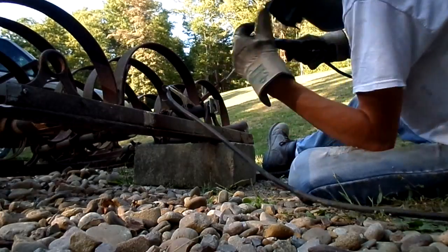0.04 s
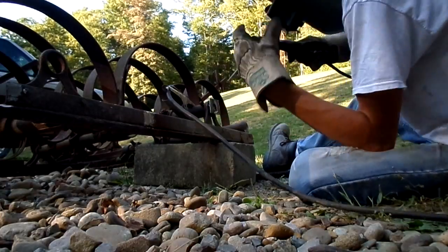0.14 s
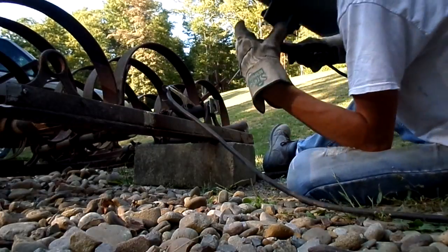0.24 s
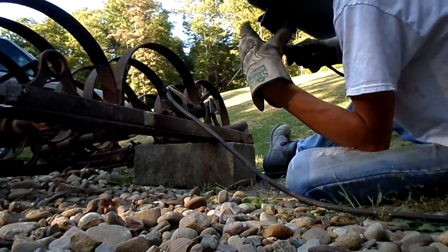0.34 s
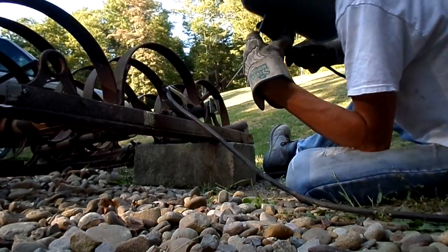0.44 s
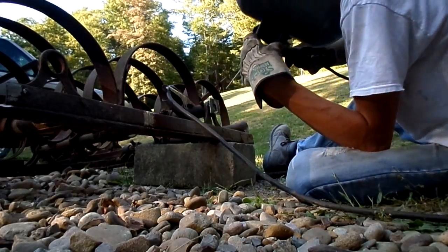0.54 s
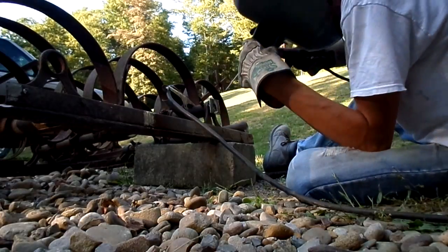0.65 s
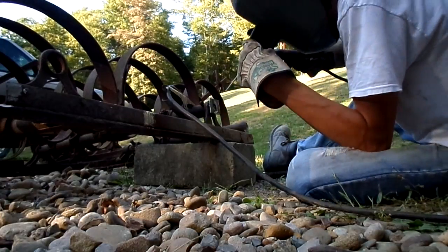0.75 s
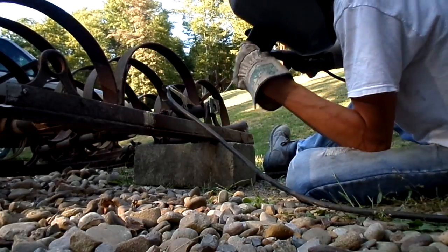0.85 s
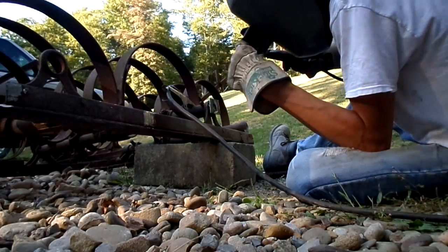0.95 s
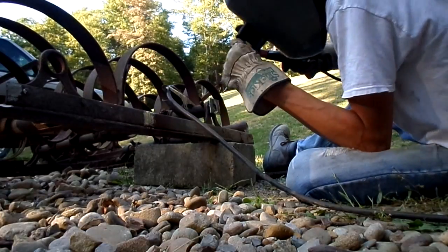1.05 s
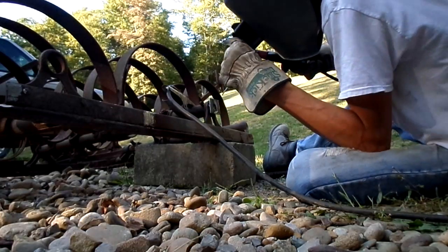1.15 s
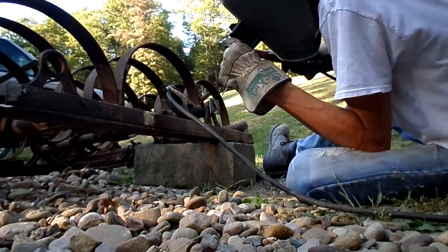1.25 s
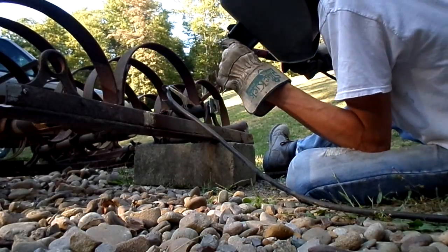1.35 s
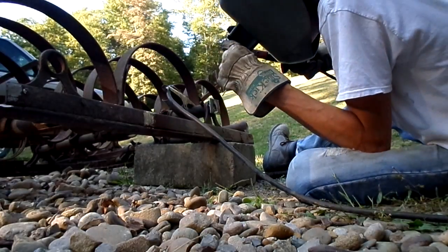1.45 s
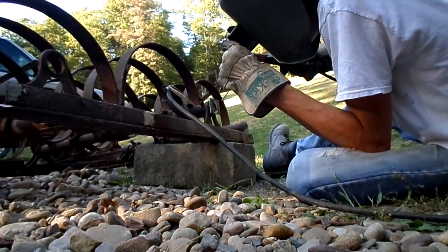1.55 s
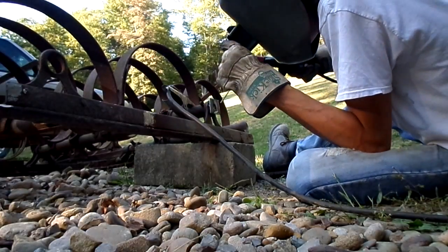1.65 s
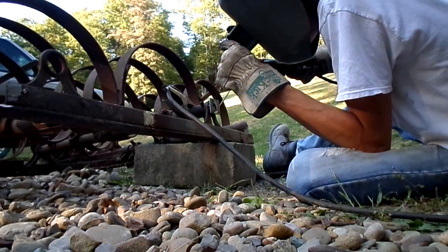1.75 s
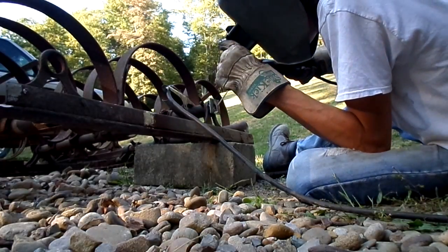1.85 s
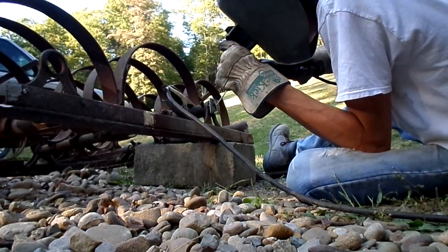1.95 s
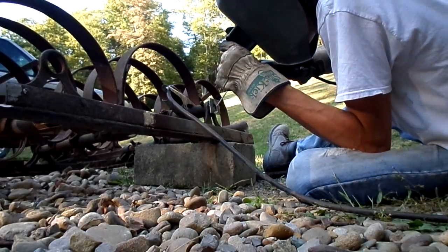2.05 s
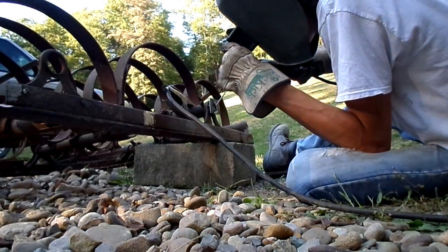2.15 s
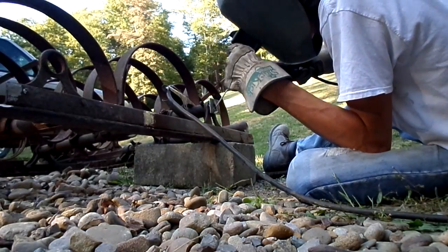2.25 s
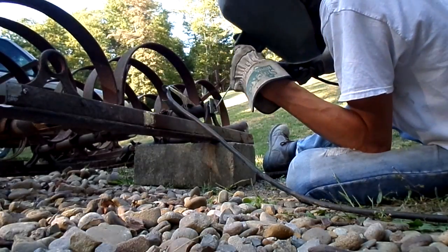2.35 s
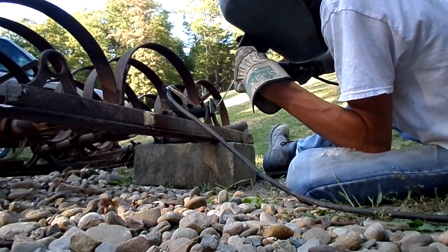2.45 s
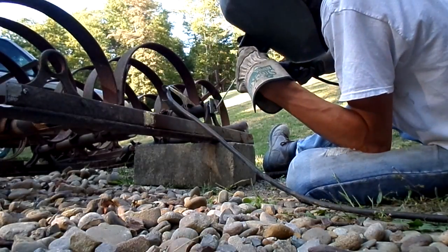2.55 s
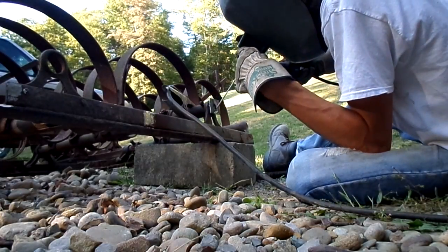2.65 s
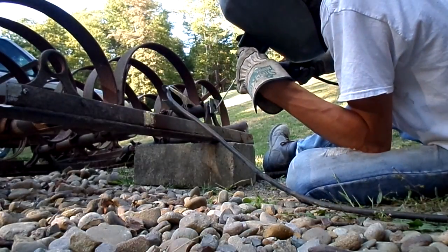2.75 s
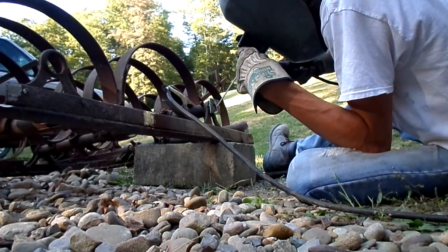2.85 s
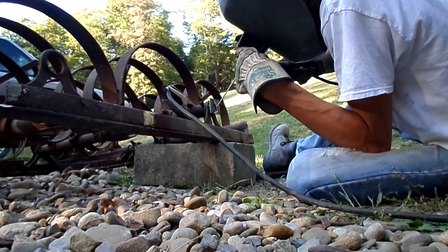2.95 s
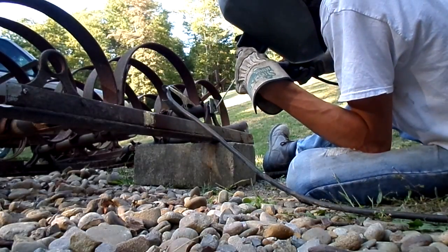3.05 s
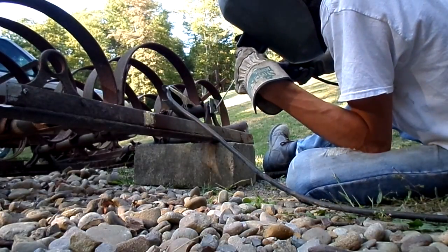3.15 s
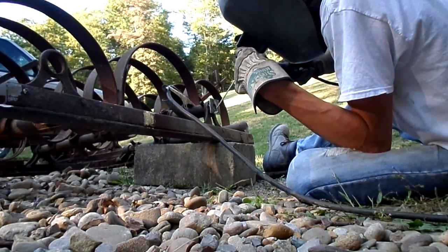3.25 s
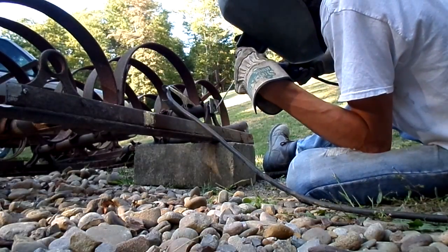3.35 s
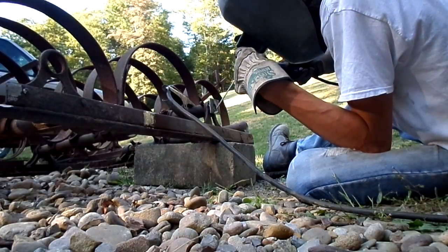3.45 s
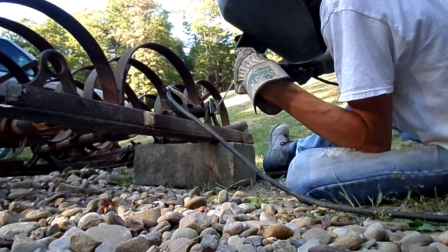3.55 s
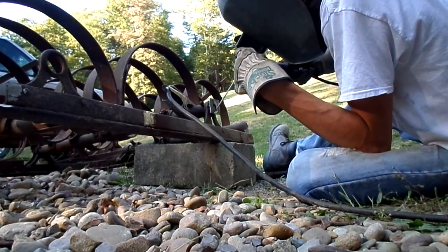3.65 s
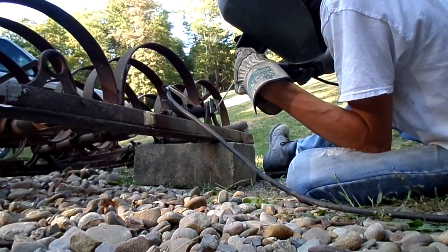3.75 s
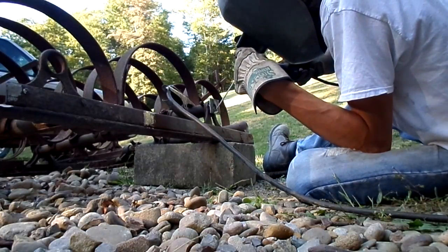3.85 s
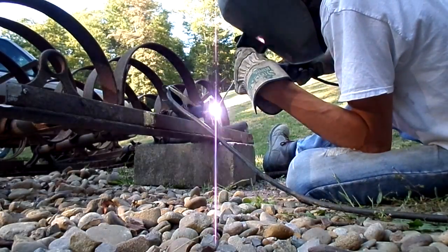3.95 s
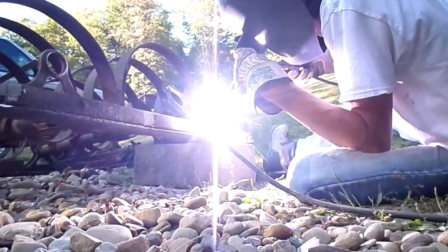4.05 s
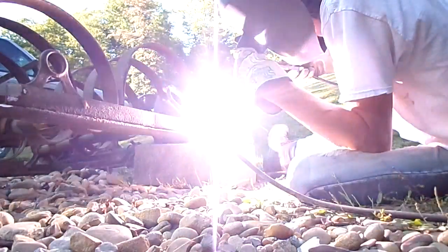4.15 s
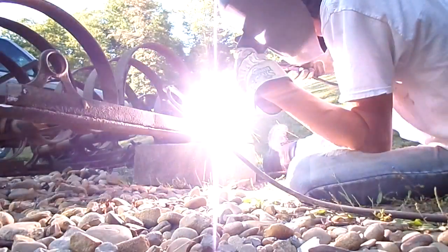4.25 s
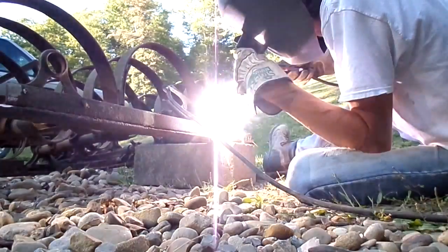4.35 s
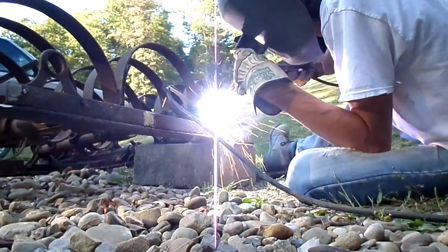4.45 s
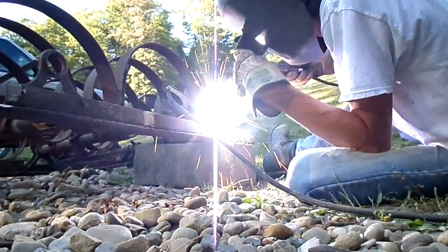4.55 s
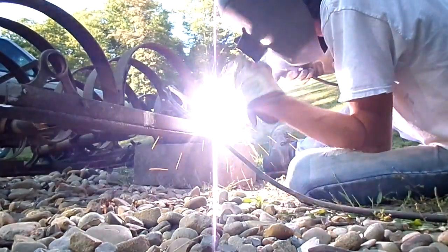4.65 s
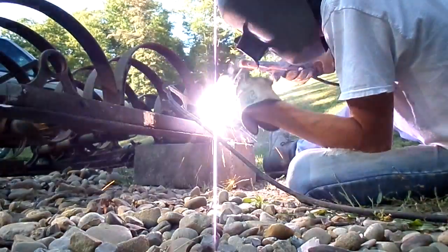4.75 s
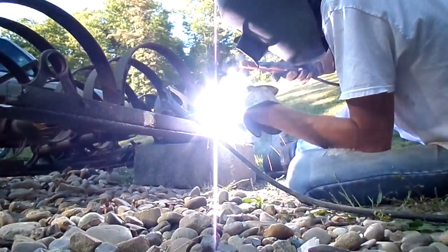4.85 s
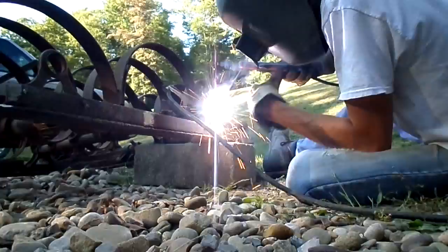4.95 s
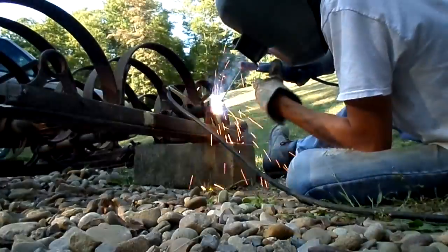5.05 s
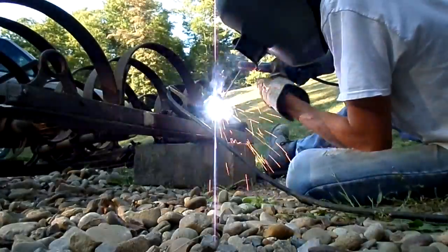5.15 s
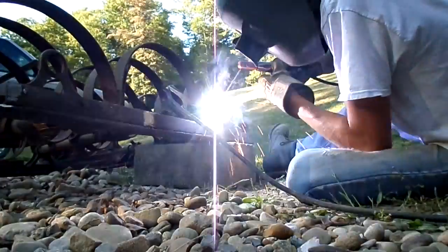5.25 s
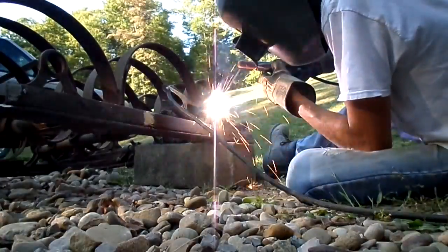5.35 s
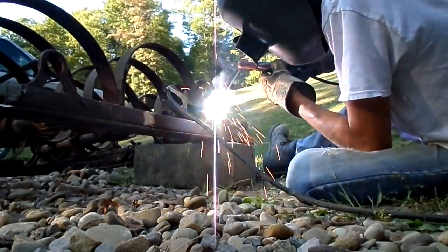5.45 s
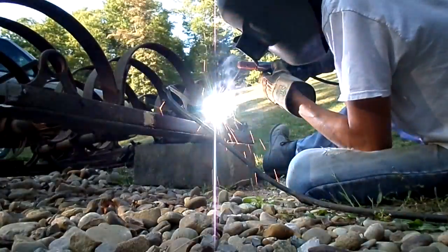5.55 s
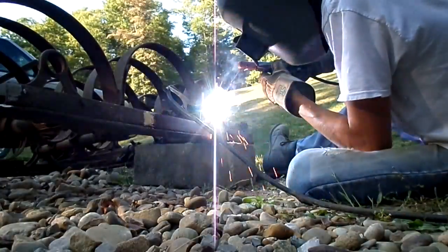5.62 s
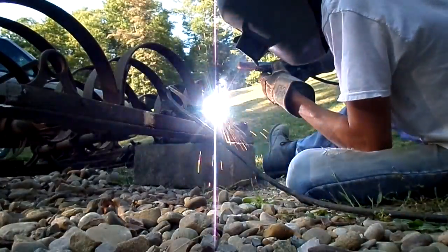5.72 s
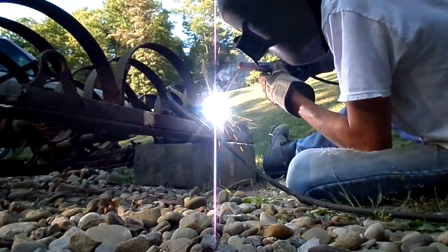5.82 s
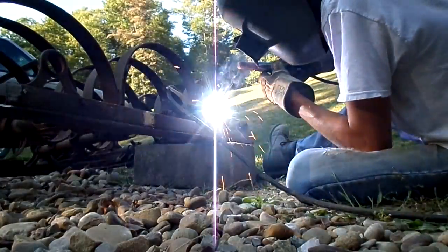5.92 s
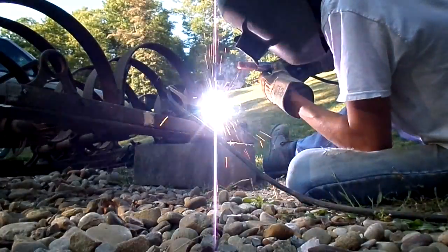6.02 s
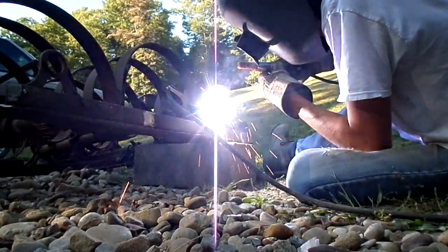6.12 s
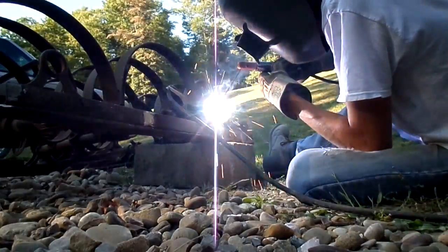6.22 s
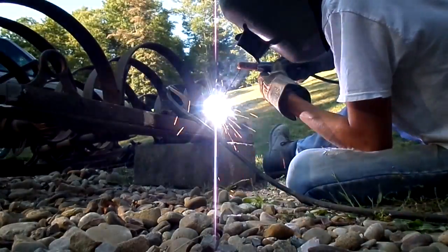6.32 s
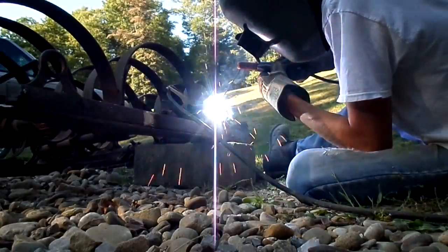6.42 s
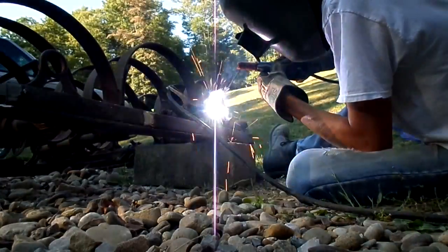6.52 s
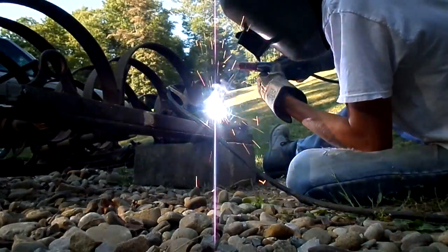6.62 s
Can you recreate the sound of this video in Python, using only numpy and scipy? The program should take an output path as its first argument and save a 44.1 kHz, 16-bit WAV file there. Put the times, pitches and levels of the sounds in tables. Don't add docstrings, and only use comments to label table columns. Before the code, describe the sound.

Outdoors, close and dry, a welding machine drones from the start: a pitched fan tone around 210 Hz, low mains hum, rushing air and slight hiss, gently wavering. At about 0.05 s a glove gives a helmet shell one dull, hollow knock. From 0.4 to 1.45 s the helmet swivels down, with a throaty plastic rub, then thinner scratchy rasping that fades. At 2.13 s a rod taps steel with a bright, short clink and a quick rebound; a faint dull touch follows at 2.43 s. Only the drone remains until 4.0 s, when the arc strikes in a loud, dense tearing burst. It settles into a bright buzzing sizzle with irregular hard pops, heavy around 4.45, 5.14 and 5.4 s. The fan sinks nearly out of hearing. From 5.7 s the fizz is thinner, with lighter spits and occasional strong snaps, still crackling when it ends near 6.7 s.

```python
import sys
import numpy as np
from scipy import signal
from scipy.io import wavfile
from scipy.ndimage import uniform_filter1d, minimum_filter1d

SR = 44100
rng = np.random.default_rng(int(sys.argv[2]) if len(sys.argv) > 2 else 0)


def wrap_up_sound(samples):
    columns = np.atleast_2d(samples).T
    tamed = np.clip(columns, -1, 1)
    steps = np.round(tamed * 32767).astype(np.int16)
    wavfile.write(sys.argv[1], SR, steps)


def ratio_of_db(decibels):
    return 10 ** (np.asarray(decibels, float) / 20)


N = 294588

MAINS_HZ = 60.0
STRIKE_S = 4.005
SPATTER_THUMP_DB = -25
TOP_HZ = 17100


def evened(x):
    return x / np.sqrt(np.mean(x ** 2) + 1e-20)


def curves(rows):
    s, *columns = np.transpose(rows)
    t = np.arange(N) / SR
    return [np.interp(t, s, c) for c in columns] + [(t >= s[0]) & (t <= s[-1])]


def add(mix, s, sound):
    part = mix[round(s * SR):][:len(sound)]
    part += sound[:len(part)]


def wander(hz):
    smooth = uniform_filter1d(rng.standard_normal(N), size=int(SR / hz / 4))
    return evened(signal.lfilter([1], [1, -np.exp(-2 * np.pi * hz / SR)], smooth))


def colour(x, points):
    f, db = np.transpose(points)
    log_hz = np.log(abs(np.fft.fftfreq(8192, 1 / SR)) + 1)
    log_gain = np.log(ratio_of_db(np.interp(log_hz, np.log(f), np.maximum(db, -100))))
    taps = np.fft.ifft(np.exp(np.conj(signal.hilbert(log_gain)))).real[:4096]
    return signal.oaconvolve(x, taps / np.linalg.norm(taps))[:len(x)]


def resonances(x, modes):
    total = 0
    for hz, width, db in modes:
        peak = signal.iirpeak(hz, hz / width, SR)
        total = total + ratio_of_db(db) * signal.lfilter(*peak, signal.lfilter(*peak, x))
    return evened(total)


def machine():
    # time in seconds, level in dB.
    drone = [(0, -28.5), (.74, -27.5), (1.4, -28), (4.0, -28.5), (4.1, -35), (4.24, -39), (4.4, -37),
             (4.5, -47), (4.9, -44.5), (5.2, -44), (5.4, -51.5), (5.69, -59), (6.2, -54), (6.68, -54)]
    # multiple of the shaft rate, level in dB.
    shaft_tones = [(2, -26), (3, -14), (4, 0), (6, -18), (7, -13), (8, -9), (11.2, -21), (12, -16),
                   (14.77, -17), (16, -20)]
    # multiple of shaft, multiple of ripple, level in dB.
    beat_tones = [(1, 1, -18), (2, 1, -19), (3, 1, -19), (1, 2, -16), (4, 1, -12), (5, 1, -15), (5, 2, -21)]
    # frequency in Hz, density in dB per Hz.
    airflow = [(15, -28), (60, -21.5), (110, -20.5), (190, -18.5), (230, -7), (258, -14.5), (350, -6),
               (440, -6.5), (550, -15), (650, -7), (800, -12), (983, -22.5), (1400, -46), (1900, -63)]
    # frequency in Hz, density in dB per Hz.
    hiss_spectrum = [(650, -17), (1100, -1.5), (1570, -5), (1820, -2.5), (2340, -5.5), (3620, -5.5),
                     (4250, -7.5), (5470, -4), (6420, -10), (7370, -0.5), (8450, -8.5), (11800, -7.5),
                     (17000, -23)]
    # start in seconds, length in seconds, level in dB.
    buzzes = [
        (4.366, 0.076, -35),
        (5.207, 0.22, -44),
        (6.383, 0.54, -53),
    ]
    shaft_hz = 52.27
    idle_hum_db, load_hum_db, surge_hum_db, surge_s = -21.5, 8.5, 8, 0.69

    level_db, _ = curves(drone)
    since = np.arange(N) / SR - STRIKE_S
    surge_db = surge_hum_db * np.exp(-abs(since) / surge_s)
    load_db = np.clip(since / 0.12, 0, 1) * (load_hum_db + surge_db)
    hum_db = level_db + idle_hum_db + load_db
    hum_db += .7 * uniform_filter1d(starving(), size=900)
    hum_db += 2.0 * (since > 0) * wander(9.0)
    shaft = 2 * np.pi * np.cumsum(shaft_hz * (1 + 0.001954 * wander(1.345))) / SR
    ripple = 2 * np.pi * 2 * MAINS_HZ * np.arange(N) / SR
    hum = ratio_of_db(hum_db + 5.5) * np.sin(ripple)
    for s, length, db in buzzes:
        n = int(length * SR)
        add(hum, s, ratio_of_db(db) * np.hanning(n) * np.sin(2 * ripple[:n]))

    tones = np.zeros(N)
    for k, m, db in [(k, 0, db) for k, db in shaft_tones] + list(beat_tones):
        shake = 0.035 * (k + 3) * wander(11.8)
        level = ratio_of_db(db + 0.17 * (k + 2) * wander(12.4))
        tones += level * np.sin(k * shaft + m * ripple + shake + 2 * np.pi * rng.random())
    air = colour(rng.standard_normal(N) * ratio_of_db(0.15 * wander(39.0)), airflow)
    hiss = colour(rng.standard_normal(N), hiss_spectrum)
    fan = ratio_of_db(1.0) * tones + ratio_of_db(-6.0) * evened(air) + ratio_of_db(-16.5) * evened(hiss)
    return hum + ratio_of_db(level_db) * fan


def struck(s, peak_db, modes):
    out, t = np.zeros(N), np.arange(6000) / SR
    ring = sum(ratio_of_db(db - 60 * t / t60) * np.sin(2 * np.pi * hz * t) for hz, db, t60 in modes)
    ring = np.minimum(t / 0.00064, 1) * ring
    add(out, s, ratio_of_db(peak_db) * ring / abs(ring).max())
    return out


def knock():
    # frequency in Hz, level in dB, t60 in seconds.
    modes = [(485, -5.5, 0.14), (1110, -12.5, 0.14), (1376, 5, 0.016), (1750, -14, 0.073),
             (2080, -18, 0.047), (3600, -11, 0.01), (5200, -14, .012), (7480, -14, .02), (11500, -15, .012)]
    return struck(.0549, -14, modes)


def helmet():
    # time in seconds, rubbing level in dB, slipping level in dB.
    swivel = [
        (.41, -52, -68),
        (.438, -36, -57),
        (.49, -33, -65),
        (.66, -35, -50.5),
        (.75, -40, -48),
        (1.0, -44, -46.5),
        (1.13, -52, -52),
        (1.37, -42.5, -52),
        (1.46, -58, -67),
    ]
    # frequency in Hz, width in Hz, level in dB.
    shell_modes = [(517, 120, 12), (1210, 230, 7), (1435, 490, -3.5), (1982, 88, -1.5)]
    pivot = [(6140, 1100, 3.5), (6940, 1500, 3), (10700, 370, 1), (11450, 1100, 1)]
    band = [(4530, 760, 0)]
    rumble = [(80.5, 78, 0)]
    grip_s = 0.512

    shell_db, band_db, on = curves(swivel)
    t = np.arange(N) / SR
    pivot_db = band_db + 5.5 - 16 * (t - swivel[0][0])
    slips = np.cumsum(55 * (1 + 0.38 * wander(14.0))) / SR % 1
    rub = rng.standard_normal(N) * ratio_of_db(2.6 * wander(47.0))
    rasp = rng.standard_normal(N) * (0.39 + np.exp(-slips / 0.23))
    rasps = ratio_of_db(band_db) * resonances(rasp, band)
    rasps += ratio_of_db(pivot_db + 6.5) * resonances(rasp, pivot)
    rasps += ratio_of_db(band_db + 2) * resonances(rub, rumble)
    grip = np.clip((t - grip_s) / 0.02 + 1, .15, 1)
    scrape_db = -1 - 22 * np.clip(t - grip_s, 0, 2)
    shell = grip * resonances(rub, shell_modes[:2])
    shell += ratio_of_db(scrape_db - 5.5) * resonances(rub, shell_modes[2:])
    return uniform_filter1d(on * 1., size=800) * (ratio_of_db(shell_db + 4.0) * shell + rasps)


def rod():
    # start in seconds, peak in dB, centre of the blow in Hz, its spread in octaves.
    taps = [
        (2.1296, -11, 3080, 1.8),
        (2.428, -30.5, 1260, 0.53),
    ]
    # frequency in Hz, level in dB, t60 in seconds.
    steel = [(1313, -4, 0.11), (1410, 4.5, 0.034), (1920, 5.5, 0.016), (2220, 2.5, 0.024), (2630, -10, .03),
             (3100, -2, 0.063), (4850, 2.5, 0.019), (5880, -6, 0.13), (6900, -15, .02), (8300, -5, .03),
             (9070, -17, 0.15), (10400, 4, .015)]
    out, t = np.zeros(N), np.arange(6000) / SR
    for s, db, blow_hz, octaves in taps:
        ring = np.zeros(6000)
        for hz, mode_db, t60 in steel:
            reach_db = -6 * (np.log2(hz / blow_hz) / octaves) ** 2
            ring += ratio_of_db(mode_db + reach_db - 60 * t / t60) * np.sin(2 * np.pi * hz * t)
        hit = ring - .4 * np.r_[np.zeros(114), ring[:-114]]
        blow = [(blow_hz, 1.5 * blow_hz * octaves, 0)]
        crack = 0.15 * resonances(rng.standard_normal(6000), blow) * np.exp(-t / 0.0066)
        add(out, s, ratio_of_db(db + 2.0) * (hit / abs(hit).max() + crack))
    return out


def graze():
    # frequency in Hz, level in dB, t60 in seconds.
    modes = [(2180, 0, 0.017), (2420, -1, 0.017), (3100, -6, 0.022), (4500, -3, 0.011), (3900, -10, .008),
             (1400, -4, .015)]
    return struck(2.1893, -22, modes)


def arc():
    # frequency in Hz, density in dB per Hz.
    spectrum = [(120, -31), (500, -17.5), (900, -16.5), (1400, -20), (2000, -26.5), (2600, -10.5),
                (3700, -16), (5100, -6.5), (6000, -13.5), (6750, -14), (7900, -9.5), (8700, -9.5),
                (9800, -5), (10800, -3.5), (11500, -4.5), (12500, -4), (13000, -10), (16500, -9)]
    # frequency in Hz, width in Hz, final share 0-1.
    groove = [(6940, 450, 0.6), (8830, 900, 0.23), (10750, 500, 0.53), (15000, 2600, 0.34)]
    # delay in seconds, level in dB.
    bounces = [(.00052, -13)]
    groove_s, sink_s = 4.33, 1

    *burst, thumps = pops()
    fizz, body = sizzle() + burst
    low = signal.butter(2, 6500, fs=SR)
    near = colour(fizz + signal.filtfilt(*low, body - fizz), spectrum)
    sunk = np.clip((np.arange(N) / SR - groove_s) / sink_s, 0, 1)
    for hz, width, share in groove:
        walls = signal.lfilter(*signal.iirpeak(hz, hz / width, SR), near)
        near = near - np.clip(share, 0, 1) * sunk * walls
    near += signal.lfilter(*signal.butter(2, 250, "high", fs=SR), thumps)
    echo = np.zeros(200)
    echo[0] = 1
    for s, db in bounces:
        echo[round(s * SR)] = ratio_of_db(db)
    return signal.oaconvolve(near, echo)[:N]


def sizzle():
    # time in seconds, level in dB.
    power = [(4.005, -22.5), (4.03, -18), (4.06, -28.5), (4.195, -36), (4.29, -31.5), (4.4, -34.5),
             (4.67, -35), (4.765, -35.5), (4.99, -33), (5.145, -38.5), (5.24, -36.5), (5.335, -35),
             (5.525, -41), (5.81, -47.5), (5.905, -48.5), (6.095, -39.5), (6.38, -42.5), (6.68, -42.5)]
    level_db, _ = curves(power)
    hold_s, pool_s = 4.05, 4.44
    body_db = np.interp(np.arange(N) / SR, [hold_s - .02, hold_s + 0.0077, pool_s - .04, pool_s + 0.037, N / SR],
                        [-4, 6, 6, -1, -8])
    on = np.arange(N) >= power[0][0] * SR
    turns = 2 * MAINS_HZ * np.arange(N) / SR + .29
    cycle = turns.astype(int)
    strength, late, tint = rng.standard_normal((cycle.max() + 1, 3)).T
    strength_db = 2.0 * strength + 0.42 * (-1) ** np.arange(len(late))
    flare = np.exp(-((turns % 1 - .5 - .07 * late[cycle]) / .18) ** 2)
    swell = 0.5 * ratio_of_db(1.9 * wander(32.0)) + ratio_of_db(strength_db[cycle]) * flare
    discharges = sparks(count=N, per_s=12000, spread_db=1.0)
    fizz = on * ratio_of_db(level_db + starving() + 3.0) * evened(swell) * discharges
    return np.array([fizz, fizz * ratio_of_db(body_db + 3.1 * tint[cycle])])


def starving():
    # start in seconds, length in seconds, change in dB.
    outages = [(4.459, 0.0084, -15), (4.798, 0.009, -9), (4.83, .008, 0), (5.022, 0.03, -11),
               (5.08, .01, -5), (5.162, 0.0226, -18), (5.21, .018, -3), (5.263, 0.0089, -2),
               (5.428, 0.06, -5), (5.53, .012, -3), (5.597, .012, 1), (5.626, 0.018, -12),
               (5.664, 0.011, -2), (5.904, .008, -5), (5.93, .01, 1), (6, .01, -2), (6.318, 0.011, -3),
               (6.346, .012, -2), (6.393, 0.015, -10), (6.464, .03, 0), (6.613, .012, -1)]
    out = np.zeros(N)
    for s, length, db in outages:
        add(out, s, db * signal.windows.tukey(int(length * SR), .3))
    return out


def sparks(count, per_s, spread_db):
    size = ratio_of_db(spread_db * np.minimum(rng.exponential(1, count), 4)) * rng.standard_normal(count)
    return evened(size * (rng.random(count) < per_s / SR))


def pops():
    # start in seconds,
    # energy in dB, share in one sharp snap 0-1, body against fizz in dB.
    strike = [(4.0062, -8, .7, -6), (4.0095, 0, .4, -6), (4.0118, 2, 0.4, -8), (4.0182, 6, .2, -7),
              (4.0266, 9.5, 0.23, -8), (4.0359, 8, .53, 0), (4.0439, 8.5, 0.27, 0), (4.0493, 6, 0.9, -2),
              (4.0519, 5, 0.5, 0), (4.0609, 5, 0.1, -6), (4.0656, 3, .75, -16), (4.0686, -1, .75, -10),
              (4.077, 0, .38, -5), (4.0837, 2.5, 0.3, 2), (4.093, 2, 0, -16), (4.1028, 2, 0.4, -6),
              (4.11, -2, .56, 0), (4.1441, -2, .52, -13), (4.1599, -5, .45, -8), (4.168, 1, .62, 5.5),
              (4.1768, -4, .36, 6), (4.2014, -1.5, 0.64, 5), (4.2103, -8, 0.2, 2), (4.2429, -4, .58, 2),
              (4.2608, -5, .35, 7), (4.3014, -12, .34, -15), (4.3102, 0, .43, 4), (4.3168, -1, 0.4, -3),
              (4.3266, -4, 0.5, -15), (4.4188, -8, .59, 8), (4.4246, -3.1, .7, 12), (4.4353, 4, 0.33, 4),
              (4.4382, -1, .7, 3), (4.4527, 5, 0.7, 0)]
    spatter = [(4.5683, .6, .38, -29), (4.7105, -2, .82, -17), (4.8202, -2, .74, -1),
               (4.9929, -3.5, 0.77, 7.5), (5.004, 2.5, 1, -1.5), (5.0693, 2.5, 0, -9),
               (5.1883, -8, .78, -3), (5.201, 0.5, 0.22, -13), (5.394, -9, .81, -6),
               (5.4935, -0.5, .67, 0.5), (5.6864, -10, 0.8, -16), (5.8094, -6.5, .86, -10),
               (5.8508, -5.5, 0.27, -9), (5.8592, -1, 0.97, -4.5), (5.887, -5.5, 0.93, -12),
               (5.903, -9, .86, -3), (5.918, -6, .25, -8), (6.0206, -6, 1, -13), (6.0263, -4, 1, -1.5),
               (6.081, -8, .69, -14), (6.103, -7, 0.7, -18), (6.125, -5, 0.7, -6), (6.235, -1.5, 0.35, -8),
               (6.2506, -3, 1, -9), (6.2846, -6.5, 0.3, -12), (6.3358, -4, .98, -8),
               (6.5708, -2.5, 0.7, -12), (6.5835, -1.5, 0.5, -5), (6.6033, 0.5, 0.36, -3.5),
               (6.6347, 2.5, .71, -4.5)]
    # as above, then thump against all in dB.
    shorts = [(4.408, -3.5, 0.3, 5, -1.5), (4.443, 12, 0.7, -4, -9.5), (4.4696, 11.5, 0.59, 2, -9),
              (4.502, 9, 0.76, -5, -16.5), (4.538, 4, .57, -2, -16), (4.585, 0.5, .42, -2, -17),
              (4.7934, 6, .8, -2.5, -18.5), (5.0122, 4.5, 1, -5, -19), (5.1193, 8, 0.2, -5, -23),
              (5.136, 12, 0.92, -2, -11), (5.1542, 4.5, .52, -4, -22), (5.2362, 7, .69, -4.5, -9.5),
              (5.252, 7.5, 0.44, -4, -48), (5.32, 4, .45, -4, -21), (5.4025, 12.5, .53, -2.5, -13.5),
              (5.41, 5.5, .48, -1, -35), (5.4265, 7.5, 0.65, -4, -14.5), (5.554, 5, .94, -3.5, -36),
              (5.6185, 8, .81, -7, -10), (5.7184, 7, 0.97, -18, -9.5), (6.1095, 4.5, .83, -6, -19),
              (6.3426, 3.5, .7, -8.5, -24), (6.3846, 2.5, 0.55, 2, -28), (6.4187, 11.5, .64, -10, -11),
              (6.535, 3, 0.56, -7, -21.5)]
    strike_thump_db = -23

    events = list(shorts)
    events += [(*row, strike_thump_db) for row in strike]
    events += [(*row, SPATTER_THUMP_DB) for row in spatter]
    out, t = np.zeros((3, N)), np.arange(400) / SR
    for s, db, snap, body_db, thump_db in events + flecks():
        snap = np.clip(0.96 * snap, 0, 1)
        rise = .0003 + .002 * (1 - snap) ** 2
        envelope = np.minimum(t / rise, 1) * np.exp(-np.maximum(t - rise, 0) / 0.0023)
        spray = envelope * sparks(count=400, per_s=11000, spread_db=-4.0)
        burst = np.sqrt(1 - snap) * spray / np.linalg.norm(spray)
        burst[int(rise * SR)] += np.sqrt(snap)
        push = (1 - t / 0.0014) * np.exp(-t / 0.00016)
        push = push - push.mean() * 2 * np.hanning(400)
        add(out[0], s - rise - .0001, ratio_of_db(db + 0.5) * burst)
        add(out[1], s - rise - .0001, ratio_of_db(db + body_db - 1.5) * burst)
        add(out[2], s - .0001, ratio_of_db(db + thump_db - 3.5) * push / np.linalg.norm(push))
    return out


def flecks():
    # start in seconds, energy in dB, body against fizz in dB.
    flares = [(4.1176, -4.0, -3), (4.1339, -4.5, 1), (4.232, -4.5, 0), (4.2682, -3, 6), (4.3432, -3, 9),
              (4.3508, -2.5, 8), (4.486, -5, 0), (4.5536, -4.0, -12), (4.5765, -4.0, -7), (4.6673, -2, 1),
              (4.678, -4, 1), (4.7596, -9.5, 0), (4.8434, -4.5, 4), (4.8607, -1.5, 2), (4.8934, -3, -1),
              (4.9269, -4.5, -4), (4.9444, -9, -5), (5.0187, -6.5, -2), (5.061, -8, -2), (5.0762, -8.5, -7),
              (5.0951, -5.5, -11), (5.1025, -16, -8), (5.1114, -10.5, -3), (5.128, -3, -1),
              (5.2294, -4.0, -11), (5.2436, -8.0, -8), (5.2846, -7.5, -7), (5.3343, -2.0, -9),
              (5.3434, -8.0, 1), (5.4187, -15, -7), (5.4524, -12, -7), (5.517, -12, -1), (5.5684, -11, -7),
              (5.6231, -15.0, -7), (5.6444, -16.0, -11), (5.7016, -8, -9), (5.7129, -13.5, -9),
              (5.7264, -20.0, -5), (5.8207, -15, -4), (5.8356, -14.0, -7), (5.8409, -21, -8),
              (5.8675, -23, -7), (5.924, -14, -1), (5.952, -9, -8), (5.9876, -10, -7), (6.0448, -15.0, -5),
              (6.0601, -15.5, -9), (6.088, -8, -5), (6.118, -8, -6), (6.177, -15.0, -5), (6.2293, -13, -5),
              (6.3916, -9, -5), (6.4, -10, -37), (6.4106, -10.0, -13), (6.4366, -9, -13), (6.452, -9.5, -4),
              (6.5176, -18, -15), (6.5602, -11.0, -14), (6.6404, -9, -4), (6.6611, -19, -7)]
    return [(s, db - 1.5, .17 * 2 * luck, body_db, SPATTER_THUMP_DB)
            for (s, db, body_db), luck in zip(flares, rng.random(len(flares)))]


def scene():
    return (machine() + knock() + helmet() + rod() + graze() + arc())[None]


def thin(x):
    # frequency in Hz, threshold in standard deviations.
    streaks = [(950, 4.0), (1150, 1.2), (2250, 1.1), (2500, 1.6), (5000, 1.9), (6600, 2.1), (6900, 1.1),
               (7200, 2.2), (16000, 2.2)]
    hz, t, z = signal.stft(x, SR, nperseg=2048, noverlap=1792)
    luck = uniform_filter1d(rng.standard_normal(z.shape), size=16, axis=1)
    luck = evened(uniform_filter1d(luck, size=3, axis=0))
    sag = np.repeat(rng.standard_normal(len(t) // 8 + 1), 8)[:len(t)]
    starved = luck > np.interp(hz, *np.transpose(streaks))[:, None]
    sagged = (hz[:, None] > TOP_HZ - 550 * sag) & (hz[:, None] < TOP_HZ + 300)
    lost = (starved | sagged) & (t > STRIKE_S)
    return signal.istft(z * np.where(lost, .05, 1), SR, nperseg=2048, noverlap=1792)[1][:N]


def gaps(x):
    # frequency in Hz, depth in dB.
    mask = [(800, 60), (1100, 15), (2200, 14), (2600, 20), (4000, 23), (7000, 28), (9000, 32), (14500, 32),
            (16000, 22)]
    hz, t, z = signal.stft(x, SR, nperseg=256, noverlap=192)
    power = uniform_filter1d(uniform_filter1d(abs(z) ** 2, size=2, axis=0), size=3, axis=1)
    db = 10 * np.log10(power + 1e-16)
    margin_db = db + minimum_filter1d(-db, size=37, axis=1, origin=11)
    margin_db += np.interp(hz, *np.transpose(mask))[:, None]
    margin_db += 1 * evened(uniform_filter1d(rng.standard_normal(db.shape), size=8, axis=1))
    margin_db[:, t < STRIKE_S] = 99
    top = hz > TOP_HZ
    top_db = db[top].mean(0)
    margin_db[top] = top_db - uniform_filter1d(top_db, size=60) - 13.5
    gain = np.clip(margin_db / 5 + .5, 0.06 * ~top[:, None], 1)
    return signal.istft(z * gain, SR, nperseg=256, noverlap=192)[1][:N]


def low_pass(x):
    return signal.sosfilt(signal.butter(12, 19340, fs=SR, output="sos"), x)


def record(dry):
    response = [(20, -5.5), (90, -1), (13000, 2.0), (15800, -5.5), (16850, -5.0), (17200, -17), (19300, -19)]
    port = colour(dry[0], response)
    port = port * np.sqrt(np.mean(dry ** 2)) / np.sqrt(np.mean(port ** 2))
    clipped = np.clip(port, -.99, .99)
    band_limit = signal.firwin(511, 19300, window=("kaiser", 9), fs=SR)
    limited = signal.oaconvolve(clipped, band_limit, "same")
    mix = gaps(thin(limited))[None]
    return low_pass(mix)


dry = scene()
out = record(dry)
wrap_up_sound(out)
```